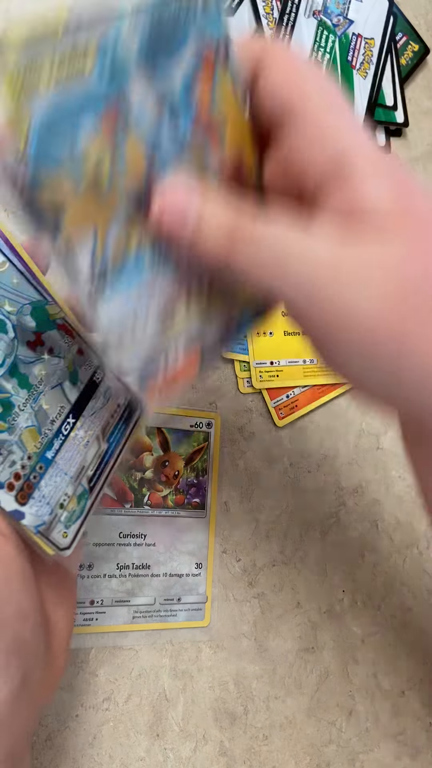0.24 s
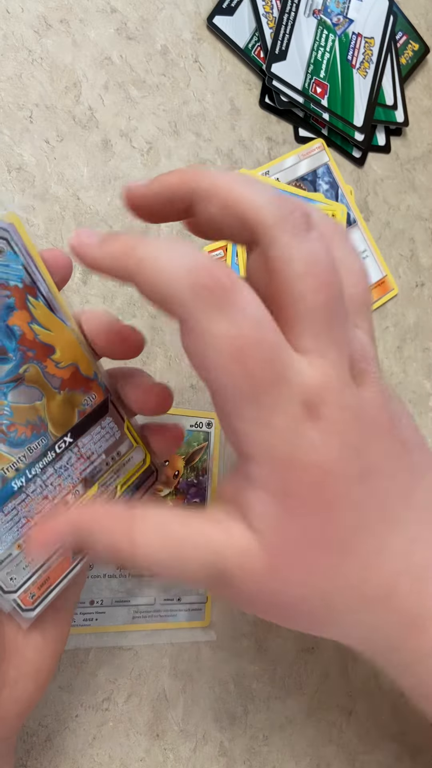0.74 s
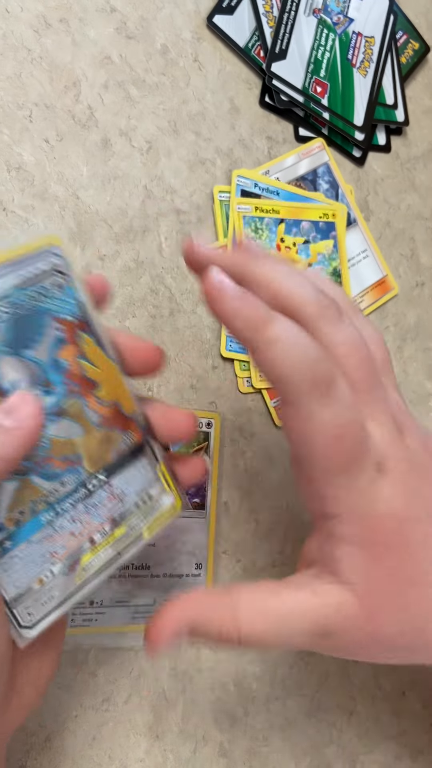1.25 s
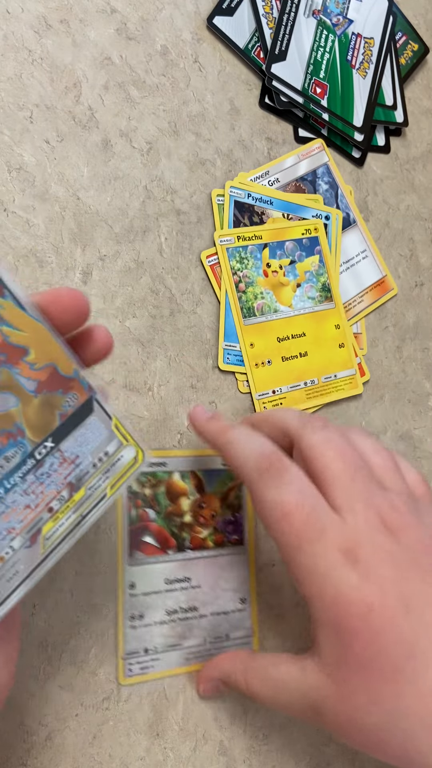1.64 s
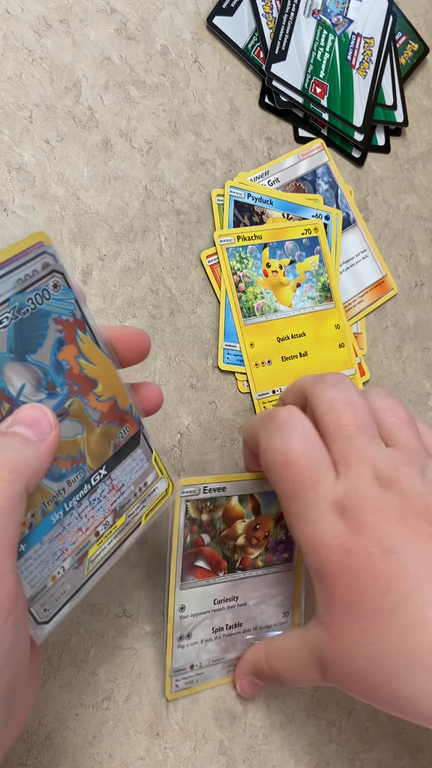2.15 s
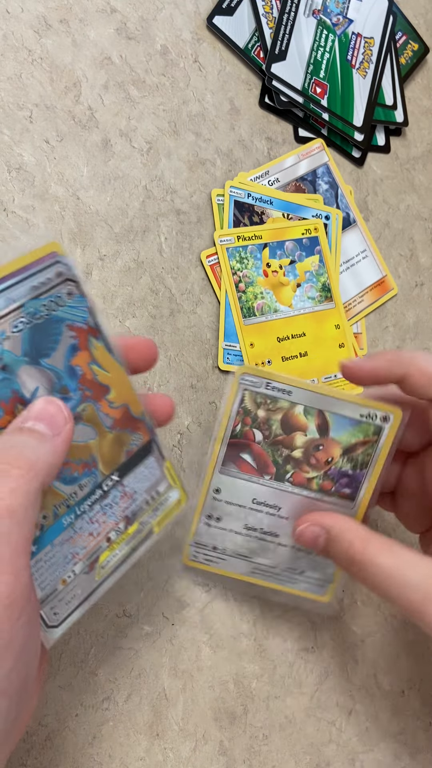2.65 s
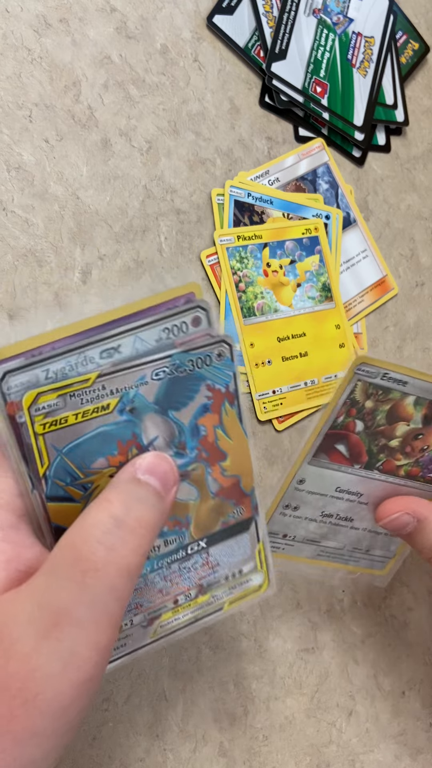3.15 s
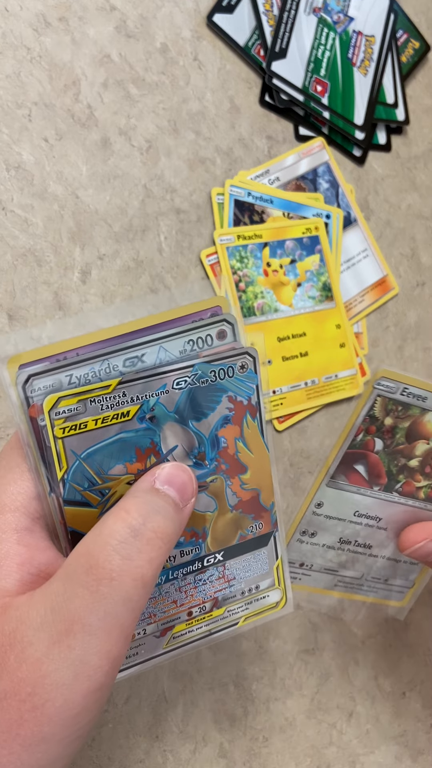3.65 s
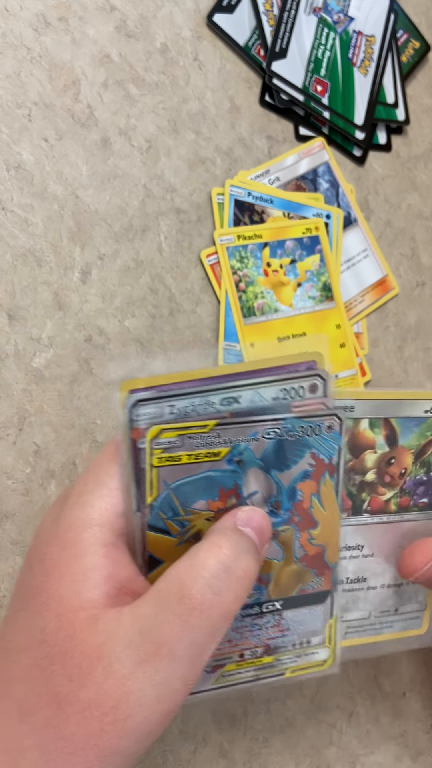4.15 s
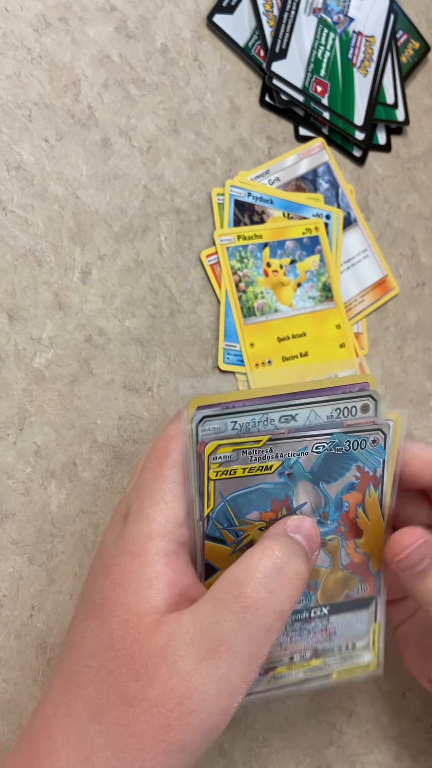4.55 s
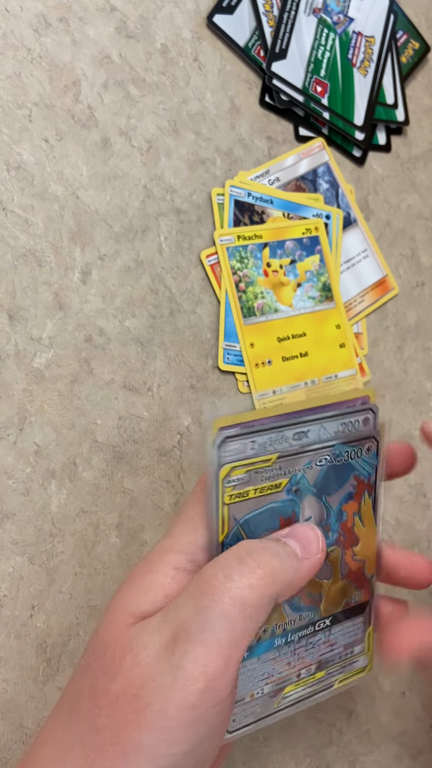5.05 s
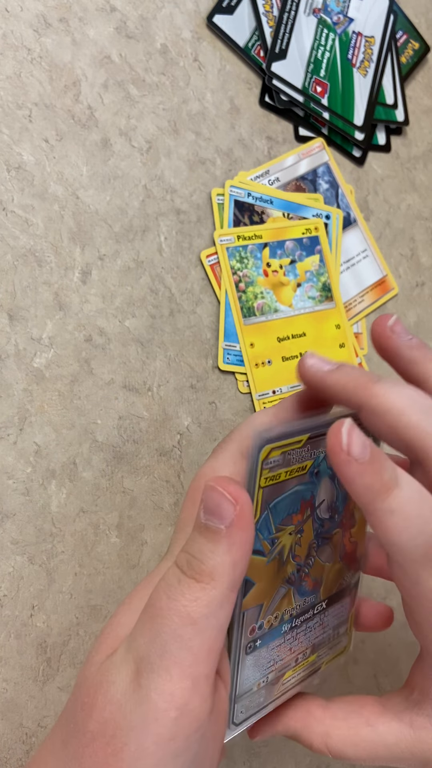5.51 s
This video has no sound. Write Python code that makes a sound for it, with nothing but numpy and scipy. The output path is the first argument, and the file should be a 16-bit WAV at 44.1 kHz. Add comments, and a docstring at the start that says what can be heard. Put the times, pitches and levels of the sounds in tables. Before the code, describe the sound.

Over a steady low ventilation rumble indoors, hands flip through plastic-sleeved cards, making faint, close rustles, thin scrapes and clicks. Early on a distant heavy knock thuds, bounces and briefly echoes, followed by a light tap as a card meets the table top. The rubbing and ticking continue, fade to almost nothing past the middle, and return with brighter swishes and a few sharp clicks of sleeve edges.

```python
"""Plastic-sleeved cards are handled over a table, close to a two-port microphone, in a ventilation rumble.
From the start the sleeves slide and scuff in tiny friction slips and their edges snap, over a faint knock.
At 1.2 s something heavy knocks further off, bounces and rings out in the room; at 1.9 s a card is set down
and the table top rings briefly. The handling goes on, turns quiet after 3 s, then picks up near 4.9 s
with bright scuffs and a last run of snaps."""
import sys
import numpy as np
from scipy import signal
from scipy.fft import rfft, irfft, next_fast_len
from scipy.io import wavfile

SR = 44100
rng = np.random.default_rng(int(sys.argv[2]) if len(sys.argv) > 2 else 0)


def master(y):
    """Save y as 16-bit WAV."""
    cut = np.clip(np.atleast_2d(y).T, -1, 1)
    pcm = np.round(cut * 32767)  # scale
    wavfile.write(sys.argv[1], SR, pcm.astype(np.int16))


N = 254853
T = np.arange(N) / SR


def amp(db):
    """Decibels to gain."""
    return 10 ** (np.asarray(db) / 20)


def unit_rms(x):
    """Scale to unit rms."""
    return x / np.sqrt(np.mean(x ** 2) + 1e-20)


def at_hz(curve, hz):
    """Read a (f/Hz, value) curve on a log frequency axis."""
    freqs, values = np.transpose(curve)
    return np.interp(np.log(hz), np.log(freqs), values)


def band(x, low_hz, high_hz, order=2):
    """Butterworth band-pass."""
    return signal.sosfilt(signal.butter(order, [low_hz, high_hz], "band", fs=SR, output="sos"), x)


def eq(x, gain_of_hz):
    """Filter by a gain (complex allowed) given as a function of Hz."""
    size = next_fast_len(x.shape[-1] + 512)
    hz = np.maximum(np.fft.rfftfreq(size, 1 / SR), 1)
    return irfft(rfft(x, size) * gain_of_hz(hz), size)[..., :x.shape[-1]]


def dull(x, above_hz):
    """Roll off the top at 12 dB per octave."""
    return eq(x, lambda hz: 1 / np.sqrt(1 + (hz / above_hz) ** 4))


def drift(rate_hz):
    """Smooth random modulator of rms 1, run at one step per 40 samples."""
    r = np.exp(-2 * np.pi * rate_hz * 40 / SR)
    slow = signal.lfilter([1], [1, -2 * r, r * r], rng.standard_normal(N // 40 + 2002))[2000:]
    return np.interp(np.arange(N) / 40, np.arange(len(slow)), unit_rms(slow))


def ring(x, hz, t60):
    """Resonator: a unit click sets a sine of height 1 ringing."""
    r, w = amp(-60 / (t60 * SR)), 2 * np.pi * hz / SR
    return signal.lfilter([0, np.sin(w)], [1, -2 * r * np.cos(w), r * r], x + 1e-18)


def friction(shape, per_s, spread_db):
    """Random slips of uneven size; rms 1."""
    sizes = amp(spread_db * np.minimum(rng.exponential(1, shape), 4)) * rng.standard_normal(shape)
    return unit_rms(sizes * (rng.random(shape[-1]) < per_s / SR) + 1e-9)


# Spectrum of the air bed: f/Hz, relative level/dB
AIR_COLOUR = [(15, -50), (25, -32.5), (49, 0.5), (188, -8), (226, -6), (265, -2), (319, -8), (366, -5),
              (420, -14), (728, -17), (798, -21), (874, -20.5), (6000, -64), (7800, -63), (13200, -120)]
# Duct tones: f/Hz, width/Hz, level/dB
DUCT_TONES = [(60.74, 1.7, -62.5), (119.7, 4.1, -55), (202.1, 20.2, -56.5)]
def ventilation(air_db=-53.5):
    """The bed: steady low air noise with a few wavering duct tones."""
    air = unit_rms(eq(rng.standard_normal((2, N)), lambda hz: amp(at_hz(AIR_COLOUR, hz)))) * amp(air_db)
    for hz, width_hz, db in DUCT_TONES:
        t60 = np.log(1000) / np.pi / width_hz
        tone = ring(rng.standard_normal(N + 9000), hz, t60)[9000:]
        air[0] += amp(db) * unit_rms(tone)
    return air


# Blows and bounces: t/s, room level/dB, tilt/dB per octave, room time factor, mode level/dB, favoured f/Hz
BLOWS = [(0.0, -51.5, 0.5, 1.8, -48.5, 720), (1.2094, -33, 3.5, 0.59, -30.5, 1630),
         (1.215, -28, -1.5, 0.74, -22.5, 352), (1.488, -45, 2, 0.63, -41, 1500),
         (1.498, -41.5, -2, 0.93, -33, 260), (1.659, -53.5, -2, 1.2, -42, 147)]
# Colour of the room tail: f/Hz, relative level/dB
ROOM_COLOUR = [(40, -1.5), (65, -3), (82, -3.5), (150, -7), (210, -4), (363, -6), (538, -11.5),
               (971, -10.5), (1210, -24.5), (1600, -16), (3300, -25), (5600, -34), (8500, -36),
               (15000, -47)]
# Room decay, before each blow's time factor: f/Hz, t60/s
ROOM_DECAY = [(50, 0.93), (200, 0.71), (500, 0.67), (1500, 0.56), (4000, 0.52), (9000, 0.043)]
# Base attack of the room and delay of the modes, lows swelling later: f/Hz, rise/s
KNOCK_ATTACK = [(50, 0.011), (150, 0.0077), (350, 0.01753), (1000, 0.00344), (5000, 0.0024)]
# Modes of the struck panel: f/Hz, relative level/dB, t60/s
PANEL_MODES = [(52.6, -1.5, 0.3), (72.6, -15, 0.6), (99, -9, 0.15), (150.8, -12.5, 0.96),
               (213.6, -15, 0.55), (260, -11.5, 0.39), (328, -15, 0.27), (352, -8.5, 0.58),
               (463.3, -10.5, 0.34), (610, -15.5, 0.36), (689, -18, .5), (751, -7.5, 0.15),
               (800, -39, 0.18), (959, -20, 0.66), (1035, -21, 0.37), (1515, -19.5, 0.31),
               (1630, -14, 0.09), (1730, -24, 0.3), (1930, -23.5, 0.1), (2090, -19, 0.2), (2620, -36, 0.19),
               (2920, -22.5, 0.24)]
def knocks(thud_s=1.223, thud_db=-18):
    """Distant blows ring a panel and leave room noise that dies band by band; the main one has a thud."""
    out, edges = np.zeros((2, N)), 30 * 2 ** np.arange(0, 9.1, .5)
    white = rng.standard_normal((2, 2, N))
    for k, (low, high) in enumerate(zip(edges, edges[1:])):
        hz, envelope = np.sqrt(low * high), np.zeros(N)
        for s, db, tilt_db, stretch, _, _ in BLOWS:
            age = np.maximum(T - s, 0) / stretch
            rise = 1 - np.exp(-age / at_hz(KNOCK_ATTACK, hz))
            band_db = db + tilt_db * np.log2(min(hz, 3500) / 300)
            envelope += rise * amp(band_db - 60 * age / at_hz(ROOM_DECAY, hz))
        out += amp(at_hz(ROOM_COLOUR, hz) + 20.5) * envelope * band(white[k % 2], low, high)
    for hz, db, t60 in PANEL_MODES:
        hits = np.zeros(N)
        for s, _, tilt_db, _, modes_db, favoured_hz in BLOWS:
            favour_db = 6 * np.exp(-(np.log2(hz / favoured_hz) / 0.059) ** 2)   # set by the spot struck
            hit_db = modes_db + db + favour_db + tilt_db * np.log2(hz / 300)
            hits[int((s + at_hz(KNOCK_ATTACK, hz)) * SR)] = amp(hit_db) * rng.choice([-1, 1])
        out[0] += ring(hits, hz, t60)
    out[0] += amp(thud_db) * ring(signal.unit_impulse(N, int(thud_s * SR)), hz=100, t60=.06)
    return out


# Modes of the table top: f/Hz, relative level/dB, t60/s
TABLE_TOP_MODES = [(247, -9, .12), (440, -20, .04), (707, -24, .04), (1300, -24, .015)]
def table_tap(at_s=1.9187, gain_db=-31.5, start_hz=700, end_hz=240, glide_s=.003):
    """A card is set down: the bending wave arrives highs first as a chirp, and the table top rings on."""
    age = np.maximum(T - at_s, 0)
    turns = end_hz * age + (start_hz - end_hz) * glide_s * (1 - np.exp(-age / glide_s))
    envelope = (age / .005) ** 2 * amp(16.5 - 60 * age / .019)   # swells for a few ms, then dies
    chirp = envelope * np.sin(2 * np.pi * turns)
    push = signal.unit_impulse(N, int((at_s + .004) * SR))
    table = sum(amp(db) * ring(push, hz, t60) for hz, db, t60 in TABLE_TOP_MODES)
    return amp(gain_db) * (chirp + table) * [[1], [0]]   # mid only


# Sliding strokes: t/s, length/s, level/dB, ramp over the stroke/dB, tilt/dB per octave
SLIDE_STROKES = [(0.0, 0.0046, -46, -16, 0.5), (0.059, 0.061, -56.5, 7, -1.5), (0.25, 0.037, -72, -13, 0.5),
                 (0.307, 0.11, -64, -3, -1.5), (0.475, 0.13, -56.5, -8.5, 2.5), (0.68, 0.22, -73, -21, -1),
                 (0.936, 0.11, -70, -1, -0.5), (1.054, 0.046, -61.5, -4, 4), (1.137, 0.54, -73, -5, -3),
                 (1.533, 0.23, -66, 1.5, 4), (1.846, 0.29, -70, 1.5, 2.5), (2.247, 0.25, -66.5, -10.5, 2),
                 (2.539, 0.25, -67.5, -3, 3.5), (2.795, 0.23, -74.5, 2, -0.5), (3.229, 0.1, -75.5, -5, 1),
                 (3.54, 0.029, -85, 2, 4), (3.71, 0.027, -91.5, -11, 14.5), (4.054, 0.038, -76, 5, -1),
                 (4.158, 0.034, -91, -17, 7), (4.203, 0.3, -69, 10, 3.5), (4.547, .16, -73.5, 2, 1.5),
                 (4.765, 0.31, -71, 3.5, 0), (5.115, 0.065, -78, -3, -0.5), (5.24, 0.014, -71.5, 7, 7),
                 (5.369, 0.11, -65.5, -19, 1), (5.506, 0.1, -69, 1, -2), (5.672, 0.11, -66.5, -13, -1.5)]
def stroke_envelope(octave, attack_s=0.037, release_s=0.075):
    """Rub gain, `octave` octaves above the edge hiss; strokes move 20 dB per attack or release time."""
    s, length, db, ramp_db, tilt_db = np.transpose(SLIDE_STROKES)[:, :, None]
    t = T[::SR // 1000]
    fades_db = -20 * (np.maximum(s - t, 0) / attack_s + np.maximum(t - s - length, 0) / release_s)
    slope_db = ramp_db * (np.clip((t - s) / length, 0, 1) - .5)
    power = np.sum(amp(db + slope_db + tilt_db * octave + fades_db) ** 2, axis=0)
    holding = amp(-86 - 2.5 * octave)   # faint rub of cards merely held
    return np.interp(T, t, np.sqrt(power + holding ** 2))


# Rub layers (sheen, edge hiss, card body): low f/Hz, high f/Hz
RUB_BANDS = [(7500, 17500), (4000, 7500), (1300, 4000)]
# Mix of those three layers: level/dB
RUB_MIX = [-2, -7, -3.5]
# Sleeve resonances: f/Hz, width/Hz, relative level/dB
SLEEVE_RESONANCES = [(1900, 350, -13), (2450, 350, -10), (3500, 500, -14), (4400, 500, -14),
                     (5400, 600, -9), (6300, 700, -11), (7400, 800, -11), (9500, 1400, -10),
                     (11400, 1400, -12), (13800, 1800, -12)]
def slide():
    """Plastic rubs: dense slips in three flickering layers; resonances come and go with the grip."""
    shared_flicker_db, out = 1.2 * drift(32), 0
    for (low, high), db in zip(RUB_BANDS, RUB_MIX):
        slips = friction((2, N), per_s=6000, spread_db=-1.0)
        rub = unit_rms(band(slips, low, high)) * amp(0.23 * drift(30))
        for hz, width_hz, mode_db in SLEEVE_RESONANCES:
            if low < hz <= high:
                resonance = unit_rms(band(slips[:, ::-1], hz - width_hz / 2, hz + width_hz / 2))
                rub += resonance * amp(mode_db + 3 * drift(8))
        octave = np.log2(low * high / np.prod(RUB_BANDS[1])) / 2
        out += unit_rms(rub) * amp(db + shared_flicker_db) * stroke_envelope(octave)
    return dull(out, above_hz=11800)


# Scuffs of sleeve on sleeve and skin: t/s, length/s, level/dB, tilt/dB per octave, squeak f/Hz,
# relative squeak level/dB, middle of the swell/share of length
SLEEVE_SCUFFS = [(0.104, 0.026, -54, 6.5, 4840, -1, 0.45), (0.101, 0.023, -70, -5, 7450, 13, 0.44),
                 (0.0, 0.1, -79, 2, 1750, 10, .4), (0.131, 0.21, -77.5, -1, 1780, 4.5, 0.31),
                 (0.305, 0.038, -58, 1, 9700, -8, 0.42), (0.309, 0.15, -77.5, -4, 2440, 11, 0.96),
                 (0.362, 0.12, -64.5, 3, 5560, -6, 0.39), (0.407, 0.18, -80.5, -13, 2350, 15, 0.95),
                 (0.582, 0.069, -74, -8.5, 2460, 7, 0.62), (0.622, 0.036, -59, 1, 6360, -17, 0.47),
                 (0.669, 0.025, -40, 5, 6500, -23, 0.35), (0.672, 0.03, -59, -8, 2570, -5, .5),
                 (0.765, 0.1, -74, -1, 6030, 2.5, 0.49), (0.803, 0.045, -64, -4.5, 3870, -0.5, 0.81),
                 (0.933, 0.022, -59, -2, 5730, -13, 0.69), (1.141, 0.018, -43.5, 2, 7800, -14.5, 0.41),
                 (1.192, 0.049, -62, -9, 2970, 11.5, 0.89), (1.55, 0.33, -73.5, 12.5, 5300, -1.5, 0.35),
                 (1.86, 0.082, -77.5, -6.5, 2300, 11, 0.33), (1.904, 0.075, -79, -16, 1490, -8, 0.31),
                 (1.968, 0.044, -64.5, 4.5, 5540, -15, 0.38), (2.334, 0.024, -54, -4.5, 2470, -20, 0.37),
                 (2.664, 0.087, -67, -7, 2330, -8, 0.17), (2.854, 0.075, -70, -3.5, 2280, -16, 0.38),
                 (3.219, 0.051, -77, 2, 5740, -1, 0.33), (3.453, 0.19, -78, -13, 2300, -2, 0.54),
                 (3.943, 0.061, -83, 3, 6150, -6, .5), (4.199, 0.037, -67, -4.5, 2800, -22, 0.48),
                 (4.409, 0.12, -83, -11, 2490, 7, 0.44), (4.6, 0.12, -90, 0, 5030, 8, .4),
                 (4.887, 0.041, -56.5, 0, 7700, -9, 0.31), (4.961, 0.099, -48, 2, 6200, -16, 0.68),
                 (4.967, 0.11, -59.5, -6, 3530, -9, 0.58), (5.356, 0.039, -51, -2.5, 2300, -18, 0.39),
                 (5.491, 0.084, -75.5, 11.5, 2680, 2, 0.56)]
def scuffs(grip_db=1.2, judder_db=2.5, colour_db=2, edge_s=0.0078):
    """Each scuff is a burst of stick and slip, tilted about 6 kHz, with a narrow squeak on top."""
    out, tail = np.zeros((2, N)), 300
    flutter = amp(grip_db * drift(28) + judder_db * drift(150))
    squeak_flutter = amp(3 * drift(35))
    bump_axis = np.linspace(np.log(1000), np.log(16000), 16)
    bumps_db = colour_db * rng.standard_normal((len(SLEEVE_SCUFFS), 16))   # each scuff has its own EQ
    for (s, length, db, tilt_db, squeak_hz, squeak_db, middle), bumps in zip(SLEEVE_SCUFFS, bumps_db):
        i, n = int(s * SR), int(length * SR)
        span = slice(i, i + n + tail)
        slips = friction((2, SR // 3), per_s=22000, spread_db=-2.0)[:, :n]
        fade_share = np.clip(max(2 * edge_s / length, 0.45 + 1.9 * length), 0, 1)   # long ones are round
        skew = np.interp(np.arange(n), [0, np.clip(middle, .05, .95) * n, n], [0, n / 2, n - 1])
        swell = signal.windows.tukey(n, fade_share)[skew.astype(int)]
        burst = np.pad(slips * flutter[i:i + n] * swell, ((0, 0), (0, tail)))
        scrape = eq(burst, lambda hz: amp(tilt_db * np.log2(np.clip(hz, 1600, 16000) / 6000)
                                          + np.interp(np.log(hz), bump_axis, bumps)))
        squeak = band(burst * squeak_flutter[span], squeak_hz * 0.903, squeak_hz * 1.103)
        out[:, span] += amp(db) * (scrape + amp(squeak_db) * unit_rms(squeak))
    return band(dull(out, above_hz=13140), 950, 18000)


# Sleeve edges snapping: t/s, relative level/dB, ring f/Hz, card tap gain/dB, crack gain/dB, t60/s
EDGE_SNAPS = [(0.0788, -45, 5440, 17, 8, 0.0046), (0.1434, -44.5, 3730, -8, -25, 0.013),
              (0.3024, -58, 9340, 8.5, -5, 0.0092), (0.323, -40.5, 5200, 6.5, -24, 0.01),
              (0.3514, -34.5, 5360, -20, -9, 0.0087), (0.692, -47.5, 3740, 12.5, 9, 0.01),
              (0.8353, -41.5, 4240, -12, -26, 0.0054), (0.921, -65, 5200, -10, -1, .015),
              (0.991, -44.5, 4000, 3.5, -7, 0.024), (1.099, -42, 5040, 1.5, 0, 0.0049),
              (1.1215, -46.5, 5940, -1, -13, .005), (1.47, -46.5, 4630, -15, -28, 0.006),
              (1.92, -54, 5560, 6, 3, 0.0041), (2.0465, -55, 6000, -5, -14, 0.0073),
              (2.25, -64, 10600, 19, -17, 0.0038), (2.342, -48, 5800, 5, 4, 0.0054),
              (2.387, -63, 2970, 13, -13, 0.0073), (2.451, -51, 2440, -14, -5, 0.0056),
              (2.682, -55, 2600, 0, 9, 0.0054), (2.6837, -43, 2400, 8, 1.5, 0.011),
              (2.7301, -34, 5240, -1, -32, 0.0077), (2.765, -60, 7000, -21, 10, .007),
              (2.9273, -50.5, 4250, 8, -28, 0.007), (3.2136, -56, 5800, -6, -8, 0.027),
              (3.8904, -71, 10000, -15.5, 2.5, 0.0044), (4.206, -59, 5000, -14.5, -3, 0.006),
              (4.218, -60, 3700, -5, -6, .008), (4.292, -62, 5100, -15, -3, 0.011),
              (4.668, -58, 5000, -16, 1, 0.0042), (4.773, -55, 5070, -25, -20, 0.0044),
              (4.8826, -65, 11000, -20, -8, .005), (4.8925, -51, 4620, 5, 3, 0.0069),
              (4.8967, -47.5, 10300, -8, -3, 0.005), (4.902, -56, 3660, 0, -2, 0.0052),
              (4.9086, -50, 5050, 14, 3, 0.003), (5.3568, -48, 4830, 2, 5, 0.0075),
              (5.3634, -49, 4930, -2, 11, 0.011), (5.3761, -49, 5900, 11, 11.5, 0.0054),
              (5.461, -41.5, 14500, -8, -12, 0.0077), (5.47, -64, 13500, -20, -12, .005),
              (5.661, -45.5, 4700, 10, -13, 0.0038), (5.6879, -40.5, 3600, 7.5, -13, 0.016),
              (5.72, -31.5, 5460, -8, -4, 0.0043)]
def snaps(rise_s=0.00041, body_db=-10.5, ring_db=-22, wake_db=-37.5, wake_t60_s=0.094):
    """An edge snaps: a bright crack, a brief ring, a duller tap of the card and a faint crackling wake."""
    n = 2000
    out, t = np.zeros((2, N + n)), np.arange(n) / SR
    for s, db, hz, tap_db, crack_db, t60 in EDGE_SNAPS:
        noise = rng.standard_normal((2, n))
        burst = noise * (1 - np.exp(-t / rise_s)) * amp(-60 * t / t60)
        burst /= np.abs(burst).max(axis=1, keepdims=True)
        crack = band(burst, 4000, 14300)
        edge = band(burst, hz * 0.9, min(hz * 1.085, 17000), order=1)
        edge[0] += amp(ring_db - 60 * t / (.7 * t60)) * np.sin(2 * np.pi * hz * t)
        tap = band(burst, 1830, 3330, order=1) + amp(body_db) * band(burst, 370, 1240, order=1)
        wake = band(noise[::-1] ** 3, 1500, 7900, order=1) * amp(wake_db - 60 * t / wake_t60_s)
        snap = amp(crack_db) * crack + amp(6.0) * edge + amp(tap_db) * tap + wake
        i = int(s * SR)
        out[:, i:i + n] += amp(db + 7.5) * snap
    return out[:, :N]


def ports(pair, likeness, balance):
    """A mid and side pair becomes left and right, as alike and as loud as the two ports hear them."""
    alike = lambda hz: np.clip(at_hz(likeness, hz), 0, 1)
    mid = eq(pair[0], lambda hz: np.sqrt((1 + alike(hz)) / 2))
    side = eq(pair[1], lambda hz: np.sqrt((1 - alike(hz)) / 2))
    left = eq(mid + side, lambda hz: amp(at_hz(balance, hz) / 2))
    right = eq(mid - side, lambda hz: amp(-at_hz(balance, hz) / 2))
    return np.array([left, right])


# Colour that cupped hands and cards give the close sound: f/Hz, level/dB
HAND_EQ = [(1400, 0.5), (1850, -3.5), (2400, -0.5), (2900, 0), (3600, -0.5), (4500, 0), (5900, 1),
           (7500, 2), (9000, -0.5), (11500, 0), (15000, -1)]
# Stereo likeness of far and near sound: f/Hz, likeness/0-1
ROOM_LIKENESS = [(130, 0.98), (290, 0.92), (640, 0.022), (1700, 0.19), (3000, 0.072), (4000, 0.15),
                 (5500, 0.67), (7500, 1), (15000, 0.98)]
HAND_LIKENESS = [(640, 0.96), (1900, 0.82), (2800, 0.33), (3900, 0.67), (4700, 0.6), (5500, 0.8), (7300, 1),
                 (8800, 0.93), (10500, 0.89), (12000, 1), (13600, .99), (15000, 0.52)]
# Pan of far and near sound: f/Hz, level of left over right/dB
ROOM_PAN = [(60, 0.18), (380, 2.1), (900, 2.2), (2500, 0.21), (6000, 0.1)]
HAND_PAN = [(1200, 1), (2600, -2), (3800, -0.5), (4500, -2.5), (5200, 0.3), (15000, 0)]
def scene():
    """The mix: hands up close, table and room behind, each with its own stereo image."""
    hands = eq(slide() + scuffs() + snaps(), lambda hz: amp(at_hz(HAND_EQ, hz)))
    room = knocks() + table_tap() + ventilation()
    return ports(hands, HAND_LIKENESS, HAND_PAN) + ports(room, ROOM_LIKENESS, ROOM_PAN)


# Lag of the right port behind the left: f/Hz, phase/rad
PORT_LAG = [(0, 0), (2000, .05), (2800, .9), (4300, .9), (5200, .2), (7000, 3.05), (7500, 3.2),
            (10100, 6.2), (10800, 6.35), (13400, 9.35), (13800, 9.5), (15400, 11.9), (17000, 12.3)]
def record(dry, low_cut_hz=49, high_cut_hz=16800):
    """The microphone: the right port lags, most in the treble; deep bass and the top are cut."""
    hz, radians = np.transpose(PORT_LAG)
    right = eq(dry[1], lambda f: np.exp(-1j * np.interp(f, hz, radians)))
    wet = signal.sosfilt(signal.butter(5, low_cut_hz, "high", fs=SR, output="sos"), [dry[0], right])
    return signal.sosfilt(signal.cheby2(18, 70, high_cut_hz, fs=SR, output="sos"), wet)


dry = scene()
out = record(dry)
master(out)
```